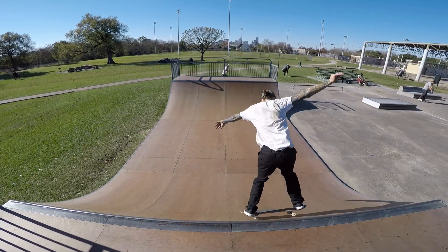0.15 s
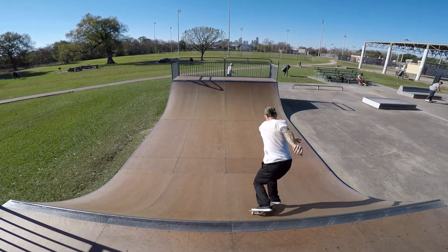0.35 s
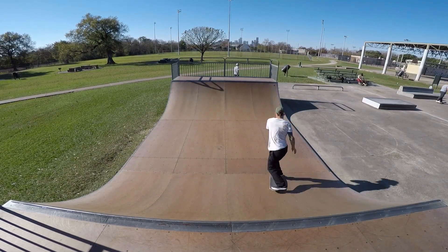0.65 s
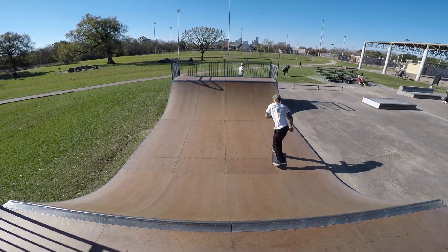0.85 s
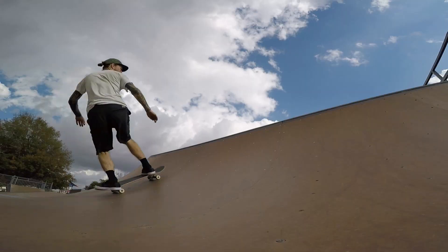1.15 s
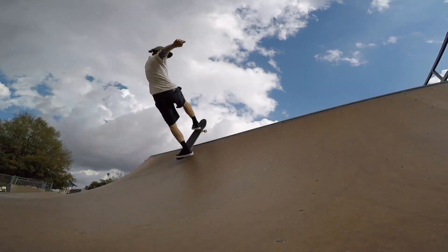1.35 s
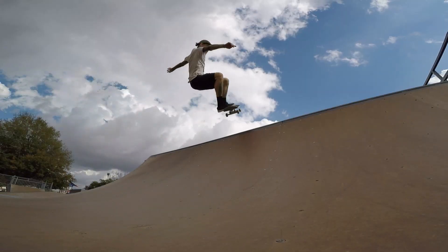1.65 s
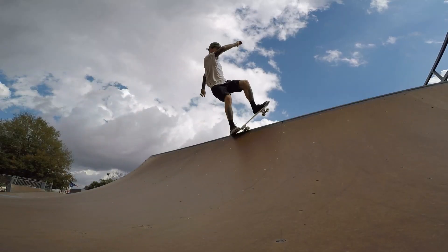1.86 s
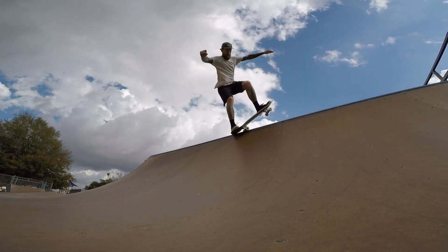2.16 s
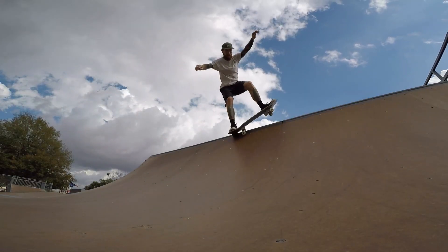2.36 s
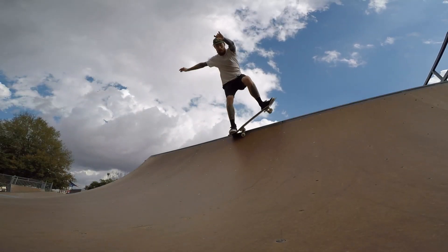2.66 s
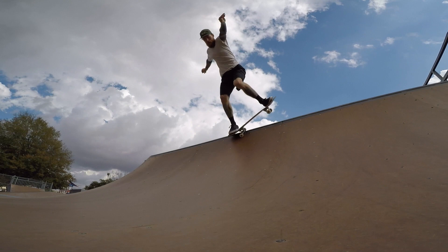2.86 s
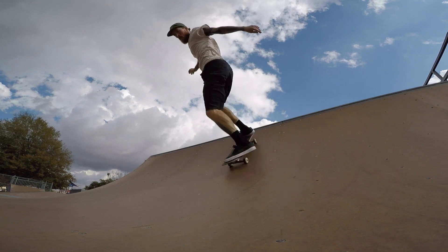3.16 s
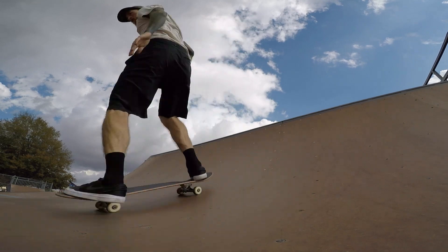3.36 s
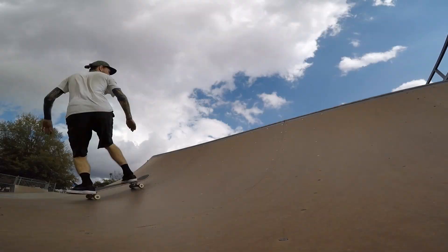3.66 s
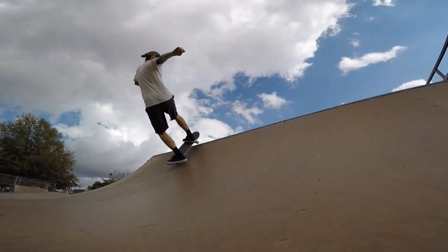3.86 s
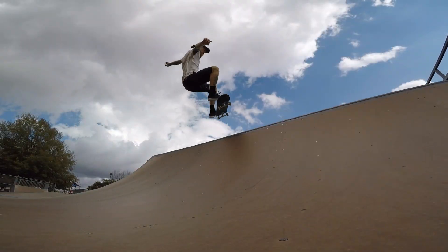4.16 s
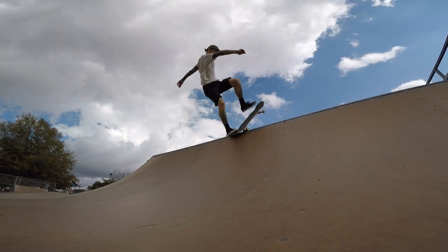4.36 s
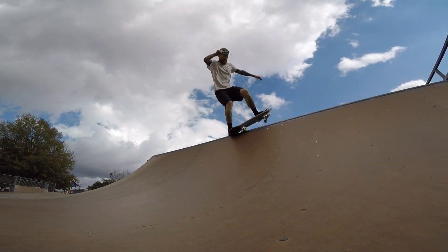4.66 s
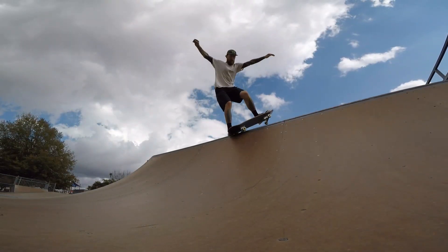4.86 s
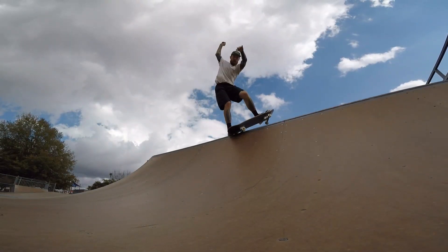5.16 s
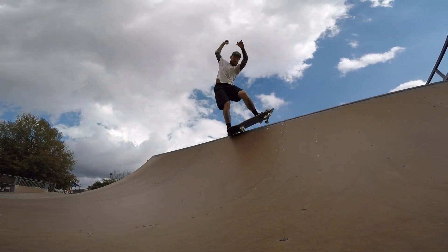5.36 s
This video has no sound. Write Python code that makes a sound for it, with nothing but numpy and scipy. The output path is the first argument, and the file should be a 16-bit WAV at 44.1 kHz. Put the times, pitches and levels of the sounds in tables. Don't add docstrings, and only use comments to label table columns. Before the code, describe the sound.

A skateboarder rides a booming plywood ramp: low rolling rumble, sharp truck and board impacts on the edge, ticking free wheel, short squeaks.

```python
import sys
import numpy as np
from scipy import signal
from scipy.fft import rfft, irfft, next_fast_len
from scipy.io import wavfile
from scipy.ndimage import uniform_filter1d, minimum_filter1d, map_coordinates

SR = 44100
rng = np.random.default_rng(int(sys.argv[2]) if len(sys.argv) > 2 else 0)


def makeup_ratio(level_db):
    decades = np.asarray(level_db, float) / 20
    return 10 ** decades


def store_wav(level_fs):
    pcm = np.round(np.clip(np.atleast_2d(level_fs), -1, 1) * 32767)
    wavfile.write(sys.argv[1], SR, pcm.T.astype(np.int16))


N = 242991
TIME = np.arange(N) / SR
CUT_S = 1.12

# (frequency [Hz], density [dB per Hz])
FRAME_FROM_DECK = [(8.8, -48), (15, -14.5), (87, 1), (108, -0.5), (130, -20.5), (170, -28.5), (290, -120)]
FRAME_ON_RAMP = [(8.8, -45), (15, -35), (54, -1.5), (91, -8.5), (113, -8), (130, -1), (170, -31),
                 (290, -120)]
# (frequency [Hz], density [dB per Hz])
PANEL_FROM_DECK = [(59, -35.5), (100, -2.5), (148, -10.5), (167, -23.5), (215, -30), (248, -15.5),
                   (310, -25.5), (400, -55.5), (680, -120)]
PANEL_ON_RAMP = [(68, -36.5), (115, -12), (152, -0.5), (173, 7), (197, 1), (243, -13), (290, -30.5),
                 (380, -44.5), (640, -120)]
# (frequency [Hz], density [dB per Hz])
PATH_FROM_DECK = [(200, -30.5), (260, -3), (300, -2.5), (352, -4), (410, -6.5), (520, -17), (720, -35.5),
                  (1040, -49), (1140, -39.5), (1300, -45), (1750, -45), (2050, -54.5), (3900, -52),
                  (4800, -58), (6000, -90.5)]
PATH_ON_RAMP = [(190, -18.5), (260, 4.5), (340, -5), (430, -6), (520, -9.5), (890, -23.5), (1100, -18),
                (1420, -24.5), (1700, -15), (2100, -23), (2300, -33.5), (2650, -36), (2950, -45.5),
                (4300, -42.5), (5000, -52), (6000, -82)]
# (frequency [Hz], width [Hz], level [dB])
SHELL_MODES = [(473, 27, -1), (730.4, 180, 10), (1090, 45, -0.5), (1700, 42, 5), (1977, 220, 6.5),
               (3100, 100, 7.5), (3815, 350, 7)]
# (frequency [Hz], width [Hz], level [dB])
RAIL_MODES = [(70, 14, 3), (98, 14, 3.5), (258, 24, 3.5), (351, 30, 11), (455, 30, 5), (1150, 60, 3),
              (2380, 300, 8), (3210, 260, 7.5), (3750, 200, 0.5)]
# (frequency [Hz], width [Hz], level [dB])
STEEL_MODE = (3340, 150, 12)
# (lowest [Hz], highest [Hz])
IMPACT_BANDS = [(320, 750), (750, 1350), (1350, 2300), (2300, 4800)]

# (time [s], load [dB])
RIDER_LOAD = [(0.0, -28), (0.1, -43), (0.16, -22.5), (0.62, -24.5), (0.9, -21.5), (1.07, -21.5), (1.2, -20),
              (1.43, -19.5), (1.68, -28), (2.1, -23.5), (2.95, -27), (3.25, -25.5), (3.45, -16),
              (3.66, -22.5), (3.9, -15.5), (4.0, -24), (4.27, -28.5), (5.51, -29)]
# (time [s], level [dB])
FRAME_SWAY = [(1.15, -38), (1.7, -27.5), (1.78, -28.5), (2.65, -31), (2.75, -33.5), (3.2, -43.5),
              (3.45, -36), (3.9, -36), (4.5, -31.5), (5.0, -31), (5.51, -39)]
# (time [s], level [dB])
LOW_MODE_LEAD = [(0.1, 0), (0.15, 5), (0.23, 5), (0.3, 0), (0.45, -4), (0.56, 2), (0.7, 0), (0.9, -4),
                 (1.12, 0)]
LOW_MODE_HZ = 84
PANEL_FAR_DB = -15
PUSH_DB, PUSH_T60_S = -5, 1.5
LURCH_DB = 1.76

# (start [s], length [s], contact [dB], weight [dB])
WHEEL_PASSES = [(0.0, 0.096, -78.5, -8), (0.097, 0.6, -67.5, 6), (0.687, 0.091, -60.5, 7.5),
                (0.735, 0.07, -66, 15), (0.794, 0.3, -66, 5), (1.137, 0.11, -52.5, -1),
                (1.329, 0.1, -63.5, 2.5), (1.79, 0.25, -70.5, 5), (2.109, 0.76, -71, 0),
                (2.807, 0.21, -61, -2.5), (3.05, 0.075, -71, 4), (3.167, 0.08, -47, -5),
                (3.24, 0.11, -43, -2), (3.399, 0.1, -47, 1), (3.512, 0.12, -58.5, 3),
                (3.703, 0.15, -51, 0.5), (3.98, 0.25, -85, 10.5), (1.47, 0.34, -75, -1.5),
                (4.347, 0.18, -66, 1), (4.754, 0.079, -55.5, -8.5), (4.56, 1, -70, 1)]
# (frequency [Hz], width [Hz], level [dB])
BEARING_MODES = [(5570, 250, -4), (6300, 350, -1.5)]
GRIP_DB_PER_S, LIFT_DB_PER_S, AIRBORNE_DB = 403.5, 247, -88
GROWL_DB, GROWL_GROWS = -28.5, 0.8
GRIT_DB, GRIT_GROWS = -62.5, 0.48
DULL_PER_DB, LIGHT_DB, DULL_HZ = .55, -76, 600

# (time [s], peak [dB], weight [dB], metal [dB], t60 [s])
DECK_STRIKES = [(0.0995, -39.5, 24.5, 2, .13), (0.1501, -48, 22.5, -4, .12), (0.26, -58, 20, -3, .1),
                (0.2789, -52, 25.5, 1, .1), (0.3052, -53.5, 27.5, -7.5, .12), (0.485, -52, 22, -2, .06),
                (0.6835, -46, 20, -19, .06), (0.72, -55, 25, -1, .05), (0.7725, -47.5, 23.5, -5.5, .08),
                (0.8826, -41, 6, -22, .06), (0.9272, -49, 24, -8.5, .1)]
# (time [s], peak [dB], weight [dB], metal [dB], t60 [s])
COPING_STRIKES = [(1.3677, -26, 5.5, -5.5, .08), (1.4171, -52.5, 17, 6, .14), (1.7045, -20, 7, -0.5, .06),
                  (1.7229, -29, 12, -9, .08), (1.7394, -43, 21, -20.5, .13), (1.7684, -24, 2, -5.5, .075),
                  (1.8224, -39.5, 7, -18.5, .13), (2.0115, -40, -8, -22, .09), (2.06, -39.5, -3, -17, .1),
                  (2.083, -44, -5, -20, .08), (2.16, -45, -2, -10, .08), (2.2489, -34.5, -2, -9.5, .07),
                  (2.304, -47, -9, -9, .1), (2.4481, -48.5, 14, -11, .14), (2.8942, -50.5, -6, 8, .22),
                  (2.9949, -25.5, 13, -17.5, .08), (3.019, -26, 4, -12.5, .08),
                  (3.0388, -24.5, 10, -7.5, .06), (3.0571, -30, -4.5, -13, .08),
                  (4.288, -20.5, 6.5, 0, .06), (4.3019, -9, -2.5, -13.5, .043),
                  (4.3452, -37.5, 11, -39.5, .12), (4.388, -44, 5, -5, .06), (4.3984, -22, -6.5, 0.5, .055),
                  (4.4218, -44, 8, -4, .15), (5.108, -53, -10, 4, .12)]
# (time [s], peak [dB], weight [dB], metal [dB], t60 [s])
SEAM_STRIKES = [(1.1278, -41, 16, -31, .13), (3.246, -41.5, 4.5, -36.5, .13),
                (3.4163, -25.5, 8, -16.5, .07), (3.443, -36, 6, -8, .05), (3.465, -27, 6, -10, .07),
                (3.4988, -30.5, 7, -11, .06), (3.7564, -37, 15, -9.5, .08), (3.78, -40.5, 12, -12, .08),
                (3.8206, -40.5, 11, -7.5, .07), (3.9051, -39.5, 14.6, -5.5, .08), (3.9337, -38, 10, 0, .06),
                (3.964, -47, 18, -2, .06)]
KNOCK_DB, KNOCK_SHARE = -1.5, 0.34

# (time [s], peak [dB], pitch [Hz], wood [dB])
CLACK_EVENTS = [(1.7075, -29.5, 2040, 10.5), (1.7195, -30, 1700, 2.5), (1.7725, -18.5, 1960, -7.5),
                (1.3695, -31, 1800, -2), (2.2485, -41, 1700, 5), (3.0205, -28.5, 1910, -2),
                (3.908, -37.5, 1810, 5.5), (3.936, -37.5, 1940, 3), (3.0395, -18, 1940, -10.5),
                (3.0505, -26.5, 1720, -11.5), (3.0595, -15, 1850, -8), (3.3815, -33.5, 1830, 0),
                (3.4172, -26, 1804, -3), (3.4295, -24, 1790, -0.5), (3.4635, -27, 1733, -2),
                (3.4715, -21, 1750, -4), (3.4995, -19.5, 1875, -4), (3.5135, -30.5, 1796, -5),
                (3.52, -35, 1780, -8), (4.289, -24, 1700, -5.5), (4.302, -17, 1700, 6.5),
                (4.341, -32.5, 1660, 1), (4.3995, -13.5, 1892, -12), (2.2535, -36, 1750, 2),
                (2.2585, -42, 1900, -3), (2.0165, -42, 1850, -12), (2.062, -48, 2000, -8),
                (4.408, -24, 1850, -10), (4.321, -29, 1750, -4), (3.967, -46, 1900, 3),
                (0.685, -48, 1420, -12), (0.885, -42, 1720, -16), (3.756, -34, 1850, 2),
                (3.4755, -25, 1800, -2)]
# (multiple of pitch, level [dB], t60 [s])
CLACK_PARTIALS = [(1, 3, 0.018), (.9, -1.5, 0.039), (1.12, -7.5, .025), (1.78, -19, 0.014),
                  (2.1, -23.5, 0.015)]
# (frequency [Hz], level [dB], t60 [s])
PLYWOOD_MODES = [(520, -1.5, 0.093), (700, -8.5, .07), (1047, -8.5, .05)]
CLACK_RISE_S = .0015

# (time [s], peak [dB])
METAL_CRACKS = [(0.1027, -50), (0.2783, -56), (0.8869, -58), (0.9268, -59), (1.265, -60), (1.3695, -40.5),
                (1.4191, -66.5), (1.707, -39), (1.7704, -50), (2.255, -57.5), (2.812, -50), (3.0016, -49),
                (3.018, -54.5), (3.041, -57.5), (3.0575, -65.5), (3.4183, -52), (3.4649, -60),
                (3.5008, -66), (3.7574, -59.5), (3.7838, -56), (3.8187, -51.5), (3.909, -52), (3.9335, -52),
                (4.29, -36), (4.398, -49.5)]
# (frequency [Hz], density [dB per Hz])
CRACK_SPECTRUM = [(4000, -31), (5000, -1.5), (5600, -0.5), (6000, -5.5), (6700, 0.5), (7500, -12.5),
                  (8800, -9.5), (11000, -17.5), (14000, -23.5), (17000, -66)]
CRACK_T60_S = 0.021
# (time [s], level [dB])
AXLE_EXCITATIONS = [
    (4.405, -51),
]
# (frequency [Hz], level [dB], t60 [s])
AXLE_PARTIALS = [(3320, 1, 0.22), (3950, -4, 0.15), (4040, -3.5, .1)]

# (time [s], peak [dB])
WHEEL_TICKS = [(1.46, -42), (1.562, -45.5), (1.888, -26.5), (1.935, -30), (1.992, -30), (2.045, -30),
               (2.123, -42), (2.16, -36.5), (2.21, -35), (2.532, -42), (2.567, -40), (2.599, -40.5),
               (2.643, -31), (2.682, -34), (2.713, -35), (2.794, -37), (4.475, -32.5), (4.517, -31.5),
               (4.564, -31.5), (4.599, -35.5), (4.628, -42), (4.709, -38.5), (4.748, -31.5), (4.783, -30.5),
               (4.823, -34), (4.863, -36.5), (4.904, -28.5), (4.943, -34), (4.975, -33), (5.005, -38)]
EDGE_DB, OTHER_WHEEL_EDGE_DB, OTHER_WHEEL_S = -13, -27, 3.5

# (time [s], pitch [Hz], level [dB])
SQUEAK_GLIDES = [
    [(2.798, 1230, -62), (2.813, 1330, -51), (2.819, 1720, -46), (2.83, 1950, -44), (2.853, 2260, -50.5),
     (2.862, 2650, -60), (2.876, 2900, -64)],
    [(2.888, 1550, -62), (2.902, 1680, -55), (2.915, 1600, -63)],
    [(4.732, 983, -57), (4.755, 882, -54), (4.785, 1065, -63)],
    [(4.785, 717, -48.5), (4.825, 935, -46.5), (4.84, 969, -44), (4.87, 1017, -50)],
    [(5.075, 1195, -58), (5.092, 1157, -53), (5.1, 997, -47), (5.11, 900, -43), (5.121, 910, -55),
     (5.132, 980, -39), (5.165, 1068, -48), (5.205, 1195, -58)],
    [(5.21, 990, -46), (5.235, 1075, -49), (5.27, 1100, -54), (5.3, 1060, -64), (5.33, 1140, -57),
     (5.35, 1140, -64), (5.375, 1130, -58), (5.42, 1110, -63)],
]
SHOE_SQUEAKS = 2
# (multiple of pitch, level [dB])
SHOE_OVERTONES = [(1, 0.5), (2, -18), (3, -17), (4, -28), (5, -25), (6, -36)]
# (multiple of pitch, level [dB])
BUSHING_OVERTONES = [(1, 6.5), (2, 1.5), (3, -17), (4, -30)]
# (time [s], level [dB])
SOLE_DRAG = [
    (2.78, -73),
    (2.822, -60.5),
    (2.884, -65),
    (3.058, -69),
    (3.08, -102),
]
# (frequency [Hz], density [dB per Hz])
GRIP_TAPE_SPECTRUM = [(1500, -42), (2500, 9.5), (3500, 3.5), (5000, -3.5), (7000, -5), (9000, -3.5),
                      (12000, -18.5), (16000, -49)]
STUTTER_DB = 4.5
MUFFLE_HZ, MUFFLE_DB = 2120, -13

# (frequency [Hz], density [dB per Hz])
HISS_SPECTRUM = [(3000, -18.5), (4500, -3.5), (6000, -3), (7400, -5.5), (8700, -1.5), (10000, -7),
                 (12000, -10.5), (14500, -29), (16000, -70.5)]
# (time [s], depth [dB])
GAIN_DUCKS = [
    (0.049, 12),
    (3.069, 18),
    (3.499, 2.5),
    (4.0, 6),
]
HISS_DB, DUCK_PER_DB, RECOVER_S = -81.5, 0.16, 0.075
SIDE_DB, CLOSING_DB_PER_S, SIDE_REST_DB = -5.5, 37.5, -61.5


def unit(x):
    return x / np.sqrt(np.mean(x ** 2) + 1e-20)


def along(points, hz):
    f, v = np.transpose(points)
    return np.interp(np.log(hz + 1), np.log(f + 1), v)


def curves(rows):
    s, *columns = np.transpose(rows)
    return [np.interp(TIME, s, column) for column in columns]


def wobble(rate):
    knots = rng.standard_normal(int(N * rate / SR) + 4)
    return map_coordinates(knots, [TIME * rate])


def after_cut(fade_s):
    return np.clip((TIME - CUT_S) / fade_s + .5, 0, 1)


def resonances(hz, modes):
    return sum(db / (1 + (2 * (hz - c) / width) ** 2) for c, width, db in modes)


def peaks(hz, modes):
    return sum(makeup_ratio(db) / (1 + (2 * (hz - c) / width) ** 2) for c, width, db in modes)


def coloured(x, gain):
    m = 2 ** 15
    cepstrum = irfft(np.log(unit(gain(np.fft.rfftfreq(m, 1 / SR))) + 1e-5), m)
    cepstrum[1:m // 2] *= 2
    cepstrum[m // 2 + 1:] = 0
    response = irfft(np.exp(rfft(cepstrum)), m)[:m // 4]
    running = np.r_[x[m // 16:0:-1], x]
    return signal.oaconvolve(running, response)[m // 16:][:N]


def heard(x, deck, ramp, band=(0, 1e5)):
    def edge(hz):
        return 1 / (1 + (band[0] / (hz + 1)) ** 12) / (1 + (hz / band[1]) ** 12)

    def deck_gain(hz):
        return makeup_ratio(along(deck, hz)) * edge(hz) * makeup_ratio(resonances(hz, RAIL_MODES))

    def ramp_gain(hz):
        return makeup_ratio(along(ramp, hz)) * edge(hz) * makeup_ratio(resonances(hz, SHELL_MODES + [STEEL_MODE]))

    after = after_cut(0.08)
    return coloured(x * (1 - after), deck_gain) + coloured(x * after, ramp_gain)


def evened(x, span_s):
    return x / np.sqrt(np.abs(uniform_filter1d(x ** 2, int(span_s * SR))) + 1e-9)


def load():
    s, db, weight_db, *_ = np.transpose(DECK_STRIKES + COPING_STRIKES + SEAM_STRIKES)
    pushes = np.zeros(N)
    pushes[np.round(s * SR).astype(int)] = makeup_ratio(db + weight_db + PUSH_DB) ** 2
    ring = signal.lfilter([1], [1, -makeup_ratio(-120 / (PUSH_T60_S * SR))], pushes)
    ring = uniform_filter1d(ring, size=1200, origin=599)
    return 10 * np.log10(makeup_ratio(curves(RIDER_LOAD)[0]) ** 2 + np.abs(ring))


def drum():
    after = after_cut(0.035)
    load_db = load()
    far_db = PANEL_FAR_DB * (1 - after)
    frame_db = load_db * (1 - after) + curves(FRAME_SWAY)[0] * after
    panel_db = load_db + far_db + LURCH_DB * wobble(7)

    frame = heard(rng.standard_normal(N), FRAME_FROM_DECK, FRAME_ON_RAMP, (0, 112))
    low_pass = signal.butter(N=4, Wn=LOW_MODE_HZ, fs=SR, output='sos')
    lower = signal.sosfiltfilt(low_pass, frame)
    lead_db = curves(LOW_MODE_LEAD)[0]
    frame = makeup_ratio(lead_db) * lower + makeup_ratio(-lead_db) * (frame - lower)

    panel = heard(rng.standard_normal(N), PANEL_FROM_DECK, PANEL_ON_RAMP, (125, 265))

    def neighbours(hz):
        return 1 / (1 + ((hz - 143) / 12) ** 2) + 0.52 / (1 + ((hz - 270) / 35) ** 2)

    others = coloured(rng.standard_normal(N), neighbours)
    others_db = -28 + 2.6 * (uniform_filter1d(load_db + far_db, SR // 8) + 19.0)
    return makeup_ratio(frame_db) * evened(frame, .08) + makeup_ratio(panel_db) * evened(panel, .055) + makeup_ratio(others_db) * others


def contact():
    t = np.arange(0, N / SR + .002, .002)
    s, length, db, weight_db = np.transpose(WHEEL_PASSES)[..., None]
    gripping = GRIP_DB_PER_S * np.maximum(s - t, 0)
    lifting = LIFT_DB_PER_S * np.maximum(t - s - length, 0)
    db = np.maximum(db - gripping - lifting, AIRBORNE_DB)
    growl_db = GROWL_DB + np.max(GROWL_GROWS * (db + 40.0) + weight_db * (db > AIRBORNE_DB), axis=0)
    grit_db = GRIT_DB + np.max(GRIT_GROWS * (db + 42) + .2 * weight_db, axis=0)
    return curves(np.transpose([t, growl_db, db.max(0), grit_db]))


def wheels():
    bumps = makeup_ratio(1.2 * wobble(40) + 2.5 * wobble(170))
    force = unit(bumps * rng.standard_normal(N))
    growl_db, roar_db, grit_db = contact()
    bands = [(245, 1492), IMPACT_BANDS[2], (2900, 4700), (2250, 2950)]
    growl, roar, grit, faint = [heard(force, PATH_FROM_DECK, PATH_ON_RAMP, band) for band in bands]
    hum = heard(force * (TIME < CUT_S), PATH_FROM_DECK, PATH_ON_RAMP, (640, 1400))

    low_pass = signal.butter(N=3, Wn=DULL_HZ, fs=SR, output='sos')
    low = signal.sosfiltfilt(low_pass, growl)
    dull_db = DULL_PER_DB * np.minimum(roar_db - LIGHT_DB, 0) * (TIME > CUT_S)
    growl = low + makeup_ratio(dull_db) * (growl - low)

    wood = makeup_ratio(growl_db + 3.5) * growl + makeup_ratio(roar_db + 0.5) * roar + makeup_ratio(grit_db - 2.2) * grit
    wood += makeup_ratio(-60.0 + .3 * (roar_db + 66.0)) * hum
    wood += makeup_ratio(-76.5 + .15 * (roar_db + 80.0)) * faint
    song = coloured(force, lambda hz: peaks(hz, BEARING_MODES))
    return wood + makeup_ratio(-78.0 + 2.2 * (roar_db + 42.5)) * song


def board():
    force = np.zeros((4, N + SR))
    t = np.arange(SR // 2) / SR - .03
    after = np.maximum(t, 0)
    rise = np.where(t < 0, makeup_ratio(-18 + 60 * t / 0.041), 1 - 0.76 * np.exp(-after / 0.0025))
    lasting = np.array([[1.5], [1.2], [1.01], [.7]])
    for s, db, thud_db, clack_db, t60 in DECK_STRIKES + COPING_STRIKES + SEAM_STRIKES:
        knock_db = KNOCK_DB + KNOCK_SHARE * thud_db
        band_db = np.array([[thud_db], [knock_db], [0], [clack_db]])
        burst = rng.standard_normal(len(t))
        burst[np.argmax(t > .0005)] += 9
        blow = makeup_ratio(-60 * after / (lasting * max(t60, .01)))
        answer = makeup_ratio(-28.5 - 60 * after / 0.22)
        start = round((s + t[0]) * SR)
        force[:, start:][:, :len(t)] += makeup_ratio(db - 5.0 + band_db) * burst * (blow + answer) * rise
    return sum(heard(f[:N], PATH_FROM_DECK, PATH_ON_RAMP, band) for f, band in zip(force, IMPACT_BANDS))


def clacks():
    out = np.zeros(N + SR)
    t = np.arange(SR // 8) / SR
    for s, db, hz, wood_db in CLACK_EVENTS:
        modes = [(k * hz, level, t60) for k, level, t60 in CLACK_PARTIALS]
        modes += [(c, level + wood_db, t60) for c, level, t60 in PLYWOOD_MODES]
        ring = 0
        for c, level, t60 in modes:
            envelope = makeup_ratio(level + rng.normal(0, 1.2) - 60 * t / t60)
            ring = ring + envelope * np.sin(2 * np.pi * (c * rng.normal(1, .015) * t + rng.random()))
        out[round(s * SR):][:len(t)] += makeup_ratio(db + 2.5) * ring * (1 - np.exp(-t / CLACK_RISE_S))
    return out[:N]


def trucks():
    force = np.zeros(N + SR)
    t = np.arange(SR // 10) / SR
    fall = makeup_ratio(-60 * t / CRACK_T60_S) + makeup_ratio(-12 - 60 * t / 0.12)
    for s, db in METAL_CRACKS:
        force[round(s * SR):][:len(t)] += makeup_ratio(db - 8.0) * fall * rng.standard_normal(len(t))
    return coloured(force[:N], lambda hz: makeup_ratio(along(CRACK_SPECTRUM, hz)))


def axle():
    out = np.zeros(N + SR)
    t = np.arange(SR // 4) / SR
    for s, db in AXLE_EXCITATIONS:
        for hz, level, t60 in AXLE_PARTIALS:
            out[round(s * SR):][:len(t)] += makeup_ratio(db + level - 60 * t / t60) * np.sin(2 * np.pi * hz * t)
    return out[:N] * makeup_ratio(2.5 * wobble(160))


def free_wheel():
    dull, edge = np.zeros((2, N))
    s, db = np.transpose(WHEEL_TICKS)
    at = np.round(s * SR).astype(int)
    edge_db = np.where(s < OTHER_WHEEL_S, EDGE_DB, OTHER_WHEEL_EDGE_DB)
    dull[at] = makeup_ratio(db + 11.5)
    edge[at] = makeup_ratio(db + edge_db + 9.5)
    decay = signal.lfilter([1], [1, -makeup_ratio(-60 / (0.03 * SR))], [dull, edge])
    shudder = 0.03 * rng.standard_normal(N) * decay
    knock = coloured(dull + shudder[0], lambda hz: 1 / (1 + ((hz - 820) / 330) ** 4))
    return knock + heard(edge + shudder[1], PATH_FROM_DECK, PATH_ON_RAMP, (1300, 3600))


def rubber():
    out = np.zeros((2, N))
    for n, rows in enumerate(SQUEAK_GLIDES):
        truck = n >= SHOE_SQUEAKS
        hz, db = curves(rows)
        phase = 2 * np.pi * np.cumsum(hz * (1 + .025 * wobble(300))) / SR
        gate = np.clip(np.minimum(TIME - rows[0][0], rows[-1][0] - TIME) / 0.0023, 0, 1)
        gate = gate * makeup_ratio(-STUTTER_DB * truck * np.abs(wobble(70)))
        for k, level in (BUSHING_OVERTONES if truck else SHOE_OVERTONES):
            overtone = k > 1
            tone_db = db + level + .9 * truck * overtone * (db + 40.0)
            tone_db = tone_db + (2.2 + 1.2 * overtone) * wobble(120)
            out[int(truck)] += gate * makeup_ratio(tone_db) * np.sin(k * phase)
    hz = np.fft.rfftfreq(N, 1 / SR)
    muffled = irfft(rfft(out[1]) * makeup_ratio(MUFFLE_DB / (1 + (MUFFLE_HZ / (hz + 1)) ** 30)), N)
    drag = unit(makeup_ratio(1.7 * wobble(250)) * rng.standard_normal(N))
    drag = drag * (TIME > SOLE_DRAG[0][0]) * (TIME < SOLE_DRAG[-1][0])
    drag = coloured(drag, lambda hz: makeup_ratio(along(GRIP_TAPE_SPECTRUM, hz)))
    return out[0] + muffled + makeup_ratio(curves(SOLE_DRAG)[0] + 1.0) * drag


def air():
    duck_db = sum(db * (TIME > s) * np.exp(-np.abs(TIME - s) / RECOVER_S) for s, db in GAIN_DUCKS)
    level_db = HISS_DB - DUCK_PER_DB * (uniform_filter1d(load(), SR // 3) + 30)
    level_db = level_db - uniform_filter1d(duck_db, size=600)
    grain = unit(makeup_ratio(2.2 * wobble(200)) * rng.standard_normal(N))
    return makeup_ratio(level_db + 4.5) * coloured(grain, lambda hz: makeup_ratio(along(HISS_SPECTRUM, hz)))


def scene():
    mid = drum() + wheels() + board() + clacks() + trucks() + axle() + free_wheel() + rubber() + air()
    turned = signal.hilbert(mid, next_fast_len(N)).imag[:N]
    side_db = np.maximum(SIDE_DB - CLOSING_DB_PER_S * TIME, SIDE_REST_DB)
    side = makeup_ratio(side_db) * (turned - .3 * mid)
    side -= makeup_ratio(-18) * np.diff(turned, 2, append=[0, 0])
    return np.array([mid + side, mid - side])


def roll_off(x):
    return signal.sosfilt(signal.butter(12, 15000, fs=SR, output="sos"), x)


def record(dry):
    need = np.minimum(1, .375 / (np.abs(dry).max(0) + 1e-9))
    gain = uniform_filter1d(minimum_filter1d(need, size=441), size=221)
    return roll_off(dry * gain)


dry = scene()
out = record(dry)
store_wav(out)
```